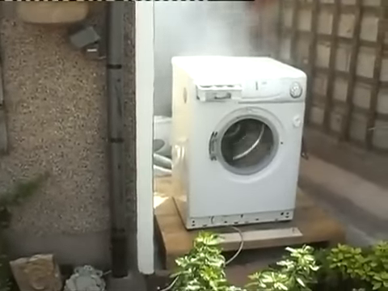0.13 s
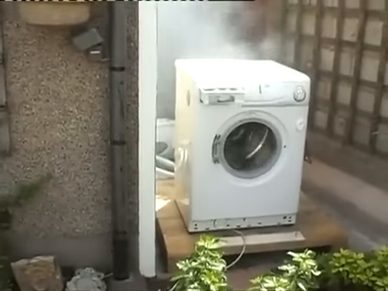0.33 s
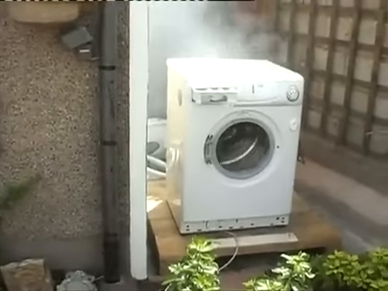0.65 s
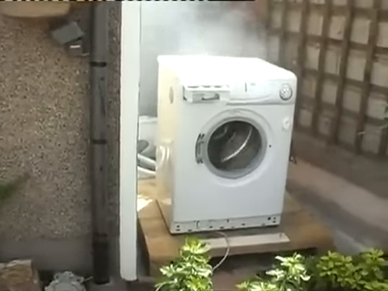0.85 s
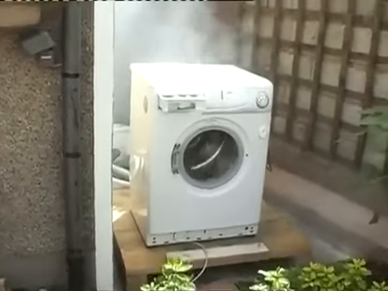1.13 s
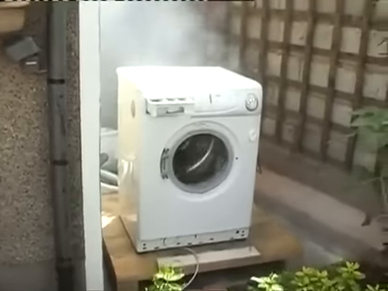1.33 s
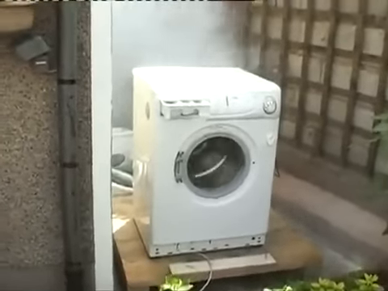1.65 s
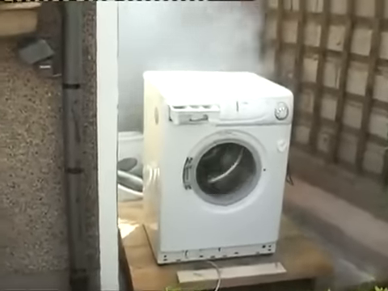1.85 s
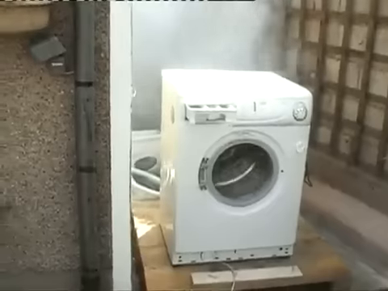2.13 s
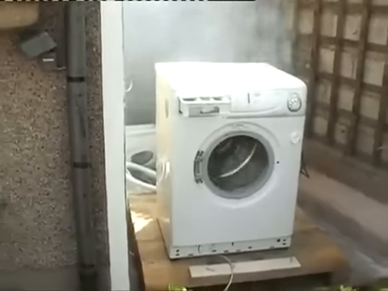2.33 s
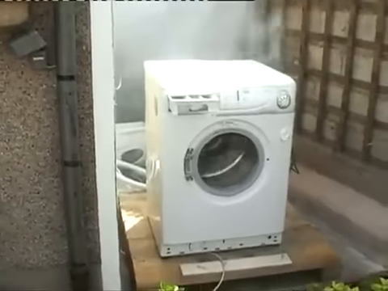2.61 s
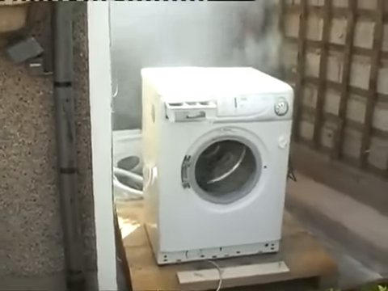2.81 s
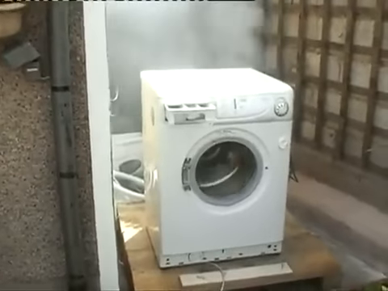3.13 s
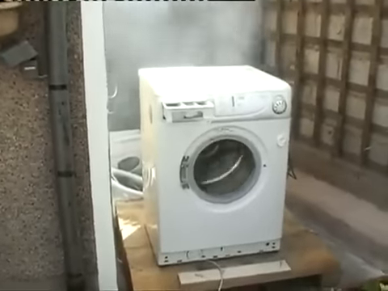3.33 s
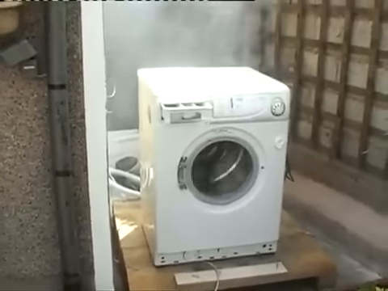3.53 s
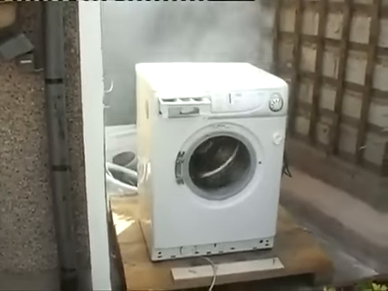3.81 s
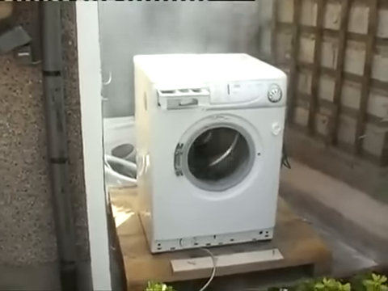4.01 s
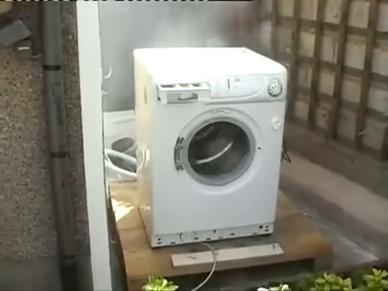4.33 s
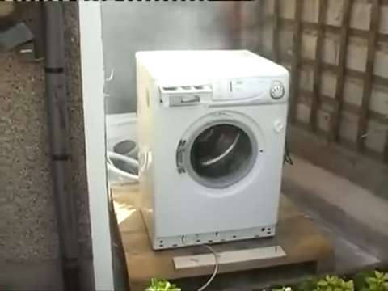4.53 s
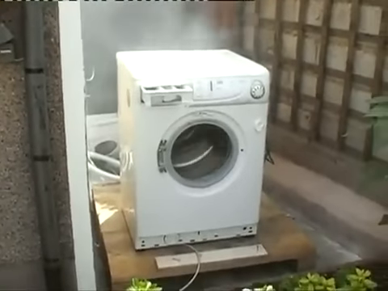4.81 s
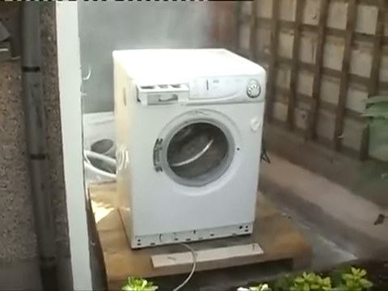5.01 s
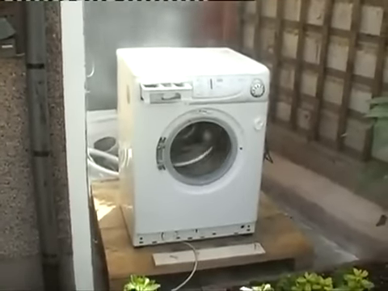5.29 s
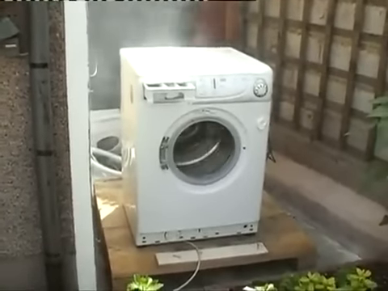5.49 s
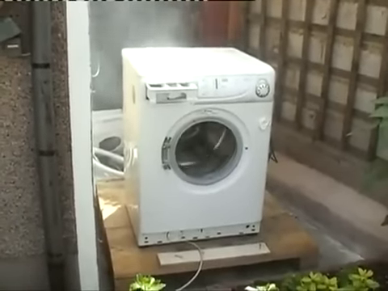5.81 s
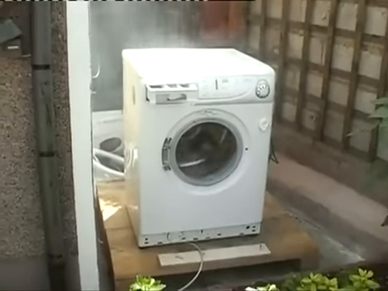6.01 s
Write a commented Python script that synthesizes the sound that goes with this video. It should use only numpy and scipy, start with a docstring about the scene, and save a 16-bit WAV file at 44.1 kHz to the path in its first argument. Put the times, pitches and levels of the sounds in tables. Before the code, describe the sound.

Loud, rapid metallic hammering runs from start to finish as a washer's lopsided drum, with a rock inside, slams against its cabinet on every turn. Ringing panels and a bright, scraping rattle sit over light, low knocks. The rhythm is tight and repetitive, and the spin sags just a little at the end. The hand-held microphone, outdoors in a small yard, is overdriven by the blows.

```python
"""A fast, clattering hammering: a washing machine spins with a rock in its drum, 15 turns a second.
On every turn the lopsided drum bumps the frame, scrapes, slams into the cabinet and rings the metal.
Each turn nearly repeats the last; the fine pattern drifts, fastest in the treble. The spin sags a
little at the end. Heard in a small yard, on a hand-held stereo microphone that the bursts overdrive."""
import sys
import numpy as np
from scipy import signal
from scipy.fft import rfft, irfft, next_fast_len
from scipy.io import wavfile
from scipy.ndimage import uniform_filter1d, map_coordinates

SR = 44100
rng = np.random.default_rng(int(sys.argv[2]) if len(sys.argv) > 2 else 0)


def dump_mix(stems):
    """Bounce the given channels to the path in sys.argv[1] as a 16-bit WAV at rate SR."""
    frames = np.atleast_2d(stems).T  # one column per channel
    limited = np.clip(frames, -1, 1)  # hard clip at full scale
    pcm = np.round(limited * 32767).astype(np.int16)
    wavfile.write(sys.argv[1], SR, pcm)


N = 271215

# broad colour of the machine: (frequency [Hz], level [dB])
BODY_COLOUR = [(60, -11.5), (150, -25.5), (400, -7.5), (570, -17), (660, -6.5), (1250, -11), (2150, -9.5),
               (2500, -16), (3500, -14.5), (5000, -7), (6200, -6), (7200, -16.5), (8000, -27), (10200, -31)]
# peaks and dips in the metal's ringing colour, negative for dips: (frequency [Hz], width [Hz], gain [dB])
METAL_COLOUR = [(127, 39, 2), (180, 205, 11), (346, 6.5, 6.5), (490, 71, 10), (483.8, 5.3, -13.5),
                (584.6, 14, 10), (628.4, 30, -2.5), (639.6, 24.8, 11.5), (723, 14, 3), (835, 95, 5.5),
                (879, 71, -11), (928, 30, 6), (987, 18.3, 10), (1089, 95, 5.5), (1197, 50, 6),
                (1275, 19, 11), (1331.5, 17, 11), (1536.4, 26, 9), (1739, 10.6, 13.5), (1838, 58, 3.5),
                (2040, 15, 11), (2190, 18, 3.5), (2646, 62, 5), (2833, 36, 6), (3032, 53, 6),
                (3590, 33, 8.5), (3910, 90, 4), (4113, 110, 4.5)]
# how long the rattle keeps its pattern: (frequency [Hz], memory [turns])
PATTERN_MEMORY = [(200, 500), (550, 280), (1300, 100), (2700, 40), (5500, 14), (9000, 8)]
# the part of the rattle that is new on every turn: (frequency [Hz], share of power [0-1])
FRESH_SHARE = [(60, .3), (200, .2), (500, .07), (1300, .09), (2700, .15), (5500, .23), (9000, .46)]
# stereo image, centred in the mids and wide in the top treble:
# (frequency [Hz], left over right [dB], left lead [rad], unshared sound [dB])
STEREO_IMAGE = [(80, .3, .02, -18), (400, .4, -.06, -25), (800, .1, -.01, -33), (1200, 0, 0, -55),
                (3000, 0, 0, -55), (4200, -.1, .1, -24), (6200, -1.4, .21, -22), (7200, -2.7, .32, -15),
                (7900, -5.3, .88, -6), (8500, -1.1, 1.25, -1), (9100, 8.3, 1.5, -1), (9700, 16.9, .8, -5),
                (10200, 14.7, .46, -7)]
# where the yard's reflections colour the sound: (frequency [Hz], relative depth [0-1])
YARD_REACH = [(500, .3), (1800, 1), (2500, 1), (4000, .2)]

TURN_SAMPLES, TURN_COUNT = 2880, 98
NOMINAL_SPIN_HZ = SR / TURN_SAMPLES
HARMONIC_HZ = np.arange(TURN_SAMPLES // 2 + 1) * NOMINAL_SPIN_HZ


def amp(db):
    """Decibels to gain."""
    return 10 ** (np.asarray(db) / 20)


def unit(x):
    """x at rms 1."""
    return x / np.sqrt(np.mean(x ** 2) + 1e-20)


def along(points, hz):
    """(frequency [Hz], value) points read on a log axis."""
    point_hz, values = np.transpose(points)
    return np.interp(np.log(hz + 1), np.log(point_hz + 1), values)


def filtered(x, response):
    """x through a complex frequency response."""
    size = next_fast_len(x.shape[-1] + SR // 2)
    hz = np.fft.rfftfreq(size, 1 / SR)
    return irfft(rfft(x, size) * response(hz), size)[..., :x.shape[-1]]


def rotation(spin_hz=15.3034, strike_s=-.0063, slows_from_s=3.9, sag_hz_per_s=.06):
    """Turns made by the drum, steady and then losing speed; it strikes at every whole turn."""
    t = np.arange(N) / SR
    return spin_hz * (t - strike_s) - sag_hz_per_s * np.maximum(t - slows_from_s, 0) ** 2 / 2


def tub_thump(pitch_hz=200, decay_ms=3, lead_ms=5.4, gain_db=-21.5):
    """The swinging tub bumps the frame just ahead of each strike: one or two dull cycles."""
    turns = rotation() + lead_ms / 1000 * NOMINAL_SPIN_HZ
    since_s = (turns % 1) / NOMINAL_SPIN_HZ
    age = since_s * 1000 / decay_ms
    return amp(gain_db) * age * np.exp(-age) * np.sin(2 * np.pi * pitch_hz * since_s)


def metal_ring(size=16384):
    """The sheet metal's answer to one tap."""
    hz = np.fft.rfftfreq(size, 1 / SR)
    metal_db = sum(gain / (1 + (2 * (hz - centre) / width) ** 2) for centre, width, gain in METAL_COLOUR)
    cepstrum = irfft(np.log(amp(along(BODY_COLOUR, hz) + metal_db)))
    cepstrum[1:size // 2] *= 2  # minimum phase: nothing rings before the tap
    cepstrum[size // 2 + 1:] = 0
    return irfft(np.exp(rfft(cepstrum)))[:size // 2]


def stroke(swing_db, lag_ms, slam_db, slam_ms, bounce_db, bounce_ms, lead_ms=0):
    """Contact force over one turn: a scrape that swells with the swing, a short slam, dying bounces."""
    turn = np.arange(TURN_SAMPLES) / TURN_SAMPLES - .5
    turn_ms = 1000 / NOMINAL_SPIN_HZ
    scrape = amp(swing_db * np.cos(2 * np.pi * (turn - lag_ms / turn_ms)))
    since_ms = (turn * turn_ms + lead_ms) % turn_ms
    slam = amp(slam_db) * np.exp(-since_ms / slam_ms)
    bounces = amp(bounce_db) * np.exp(-since_ms / bounce_ms)
    return np.sqrt(scrape ** 2 + slam ** 2 + bounces ** 2)


def chatter():
    """Tiny contacts, as turns x spin harmonics: a slowly drifting pattern plus a new share."""
    pattern, new = rfft(rng.standard_normal((2, TURN_COUNT, TURN_SAMPLES)))
    keep = np.exp(-1 / along(PATTERN_MEMORY, HARMONIC_HZ))
    for turn in range(1, TURN_COUNT):
        pattern[turn] = keep * pattern[turn - 1] + np.sqrt(1 - keep ** 2) * pattern[turn]
    fresh = along(FRESH_SHARE, HARMONIC_HZ)
    return np.sqrt(1 - fresh) * pattern + np.sqrt(fresh) * new


def yard_reflections(depth_db=1.4, span_harmonics=4, span_turns=14):
    """Reflections off the yard walls lift and cancel narrow bands as the hand-held microphone drifts."""
    patches = rng.standard_normal((TURN_COUNT, len(HARMONIC_HZ)))
    for _ in range(2):
        patches = uniform_filter1d(patches, span_turns, axis=0)
        patches = uniform_filter1d(patches, span_harmonics, axis=1)
    return amp(depth_db * along(YARD_REACH, HARMONIC_HZ) * unit(patches))


def hammering(force, ring, band_hz, evenness=0, presses=1):
    """One band of chatter, pressed by the force, run at the drum's speed and rung through the metal."""
    spectra = chatter()
    for _ in range(presses):
        spectra = rfft(irfft(spectra) * force)
        spectra /= (np.abs(spectra) + 1e-9) ** evenness  # hard contacts excite all pitches alike
    taps = irfft(spectra * yard_reflections()).ravel()
    low, high = band_hz
    taps = filtered(taps, lambda hz: ((1 + (low / (hz + 1)) ** 20) * (1 + (hz / high) ** 20)) ** -.5)
    position = (rotation() + 1.5) * TURN_SAMPLES  # the strike lies midway through each stroke
    spun = map_coordinates(taps, [position])
    return unit(signal.fftconvolve(spun, ring)[:N])


def frame_thud(ring, level_db=-37):
    """The frame takes a low knock just ahead of the drum's strike."""
    force = stroke(swing_db=3, lag_ms=10.3, slam_db=5, slam_ms=4.8,
                   bounce_db=2.5, bounce_ms=28, lead_ms=4.5)
    return amp(level_db) * hammering(force, ring, band_hz=(85, 550), evenness=1, presses=2)


def drum_rattle(ring, start_db=-21.5, rise_db_per_s=.04):
    """The drum strikes with a crack and bounces; the rock bites a little harder as it goes on."""
    force = stroke(swing_db=3.5, lag_ms=.5, slam_db=8, slam_ms=1.5, bounce_db=5.5, bounce_ms=14.6)
    level = amp(start_db + rise_db_per_s * np.arange(N) / SR)
    return level * hammering(force, ring, band_hz=(2400, 7500), evenness=.015)


def rim_fizz(ring, level_db=-30.5):
    """The rim scrapes, a fizz that swells around each strike."""
    force = stroke(swing_db=4.5, lag_ms=1.2, slam_db=-16, slam_ms=2, bounce_db=-15, bounce_ms=22)
    return amp(level_db) * hammering(force, ring, band_hz=(7500, 12000))


def panel_clang(ring, level_db=-25.5):
    """The cabinet panels clang, loudest just after the strike."""
    force = stroke(swing_db=3, lag_ms=6.5, slam_db=-15, slam_ms=4,
                   bounce_db=-9, bounce_ms=37, lead_ms=5.5)
    return amp(level_db) * hammering(force, ring, band_hz=(550, 2400), evenness=.49, presses=2)


def machine(ring):
    """The whole washer, every turn about as loud as the last."""
    return tub_thump() + frame_thud(ring) + panel_clang(ring) + drum_rattle(ring) + rim_fizz(ring)


def scene():
    """The washer stands centre; in the top treble left and right differ in level, phase and detail."""
    ring = metal_ring()
    balance, lead, unshared = [[(row[0], row[column]) for row in STEREO_IMAGE] for column in (1, 2, 3)]
    side = filtered(machine(ring), lambda hz: amp(along(unshared, hz)))

    def left_right(hz):
        """Left and right responses, with a mean of 1."""
        ratio = amp(along(balance, hz)) * np.exp(1j * along(lead, hz))
        return np.array([2 * ratio, 2 * np.ones_like(ratio)]) / (1 + ratio)

    return filtered(machine(ring), left_right) + np.array([side, -side])


def record(dry, ceiling=.56, sag_depth=2.6, bias_hz=45, dc_block_hz=(10.5, 13), top_hz=10420):
    """The overdriven microphone rounds peaks and sags under each burst, a slow throb; the top is cut."""
    power = np.mean(dry, axis=0) ** 2
    block_hz = np.array(dc_block_hz)[:, None]  # left, right
    sag = filtered(power - power.mean(),
                   lambda hz: 1j * hz / (block_hz + 1j * hz) / (1 + 1j * hz / bias_hz))
    rounded = dry / (1 + (dry / ceiling) ** 6) ** (1 / 6)
    return filtered(rounded - sag_depth * sag, lambda hz: amp(-np.clip((hz - top_hz) / 5, 0, 120)))


dry = scene()
out = record(dry)
dump_mix(out)
```